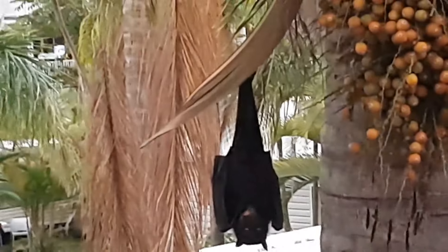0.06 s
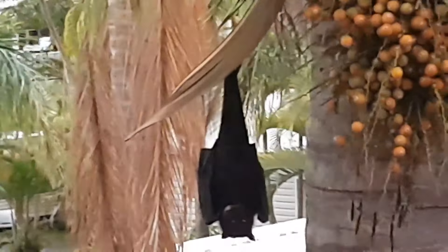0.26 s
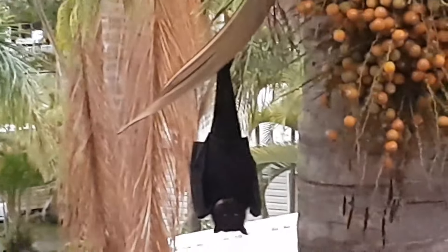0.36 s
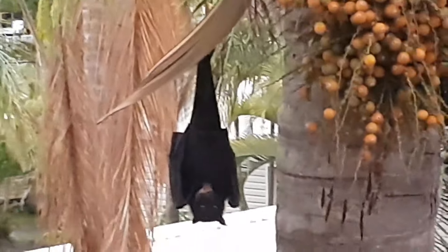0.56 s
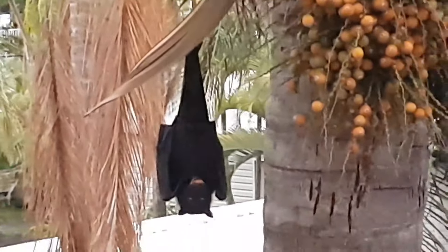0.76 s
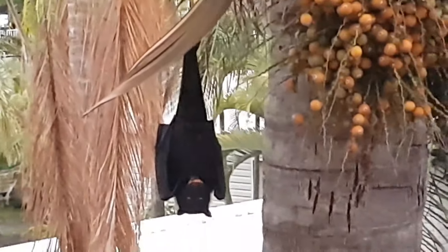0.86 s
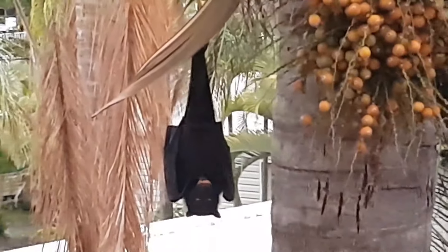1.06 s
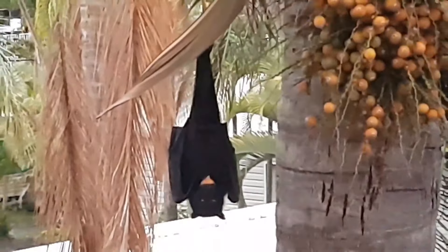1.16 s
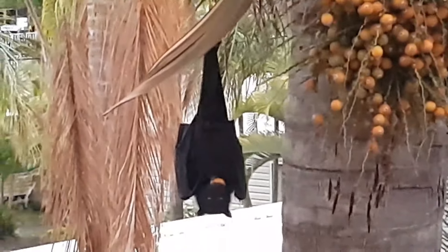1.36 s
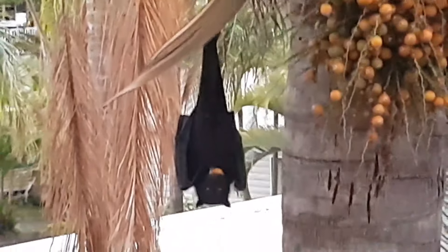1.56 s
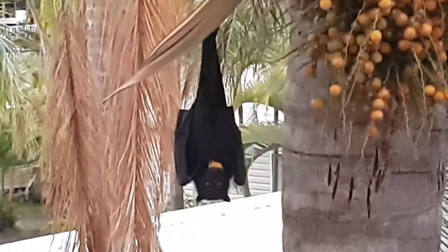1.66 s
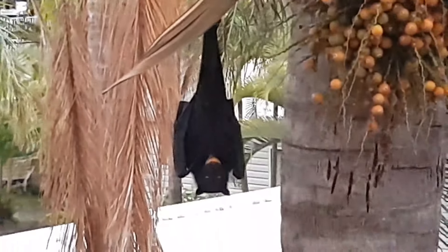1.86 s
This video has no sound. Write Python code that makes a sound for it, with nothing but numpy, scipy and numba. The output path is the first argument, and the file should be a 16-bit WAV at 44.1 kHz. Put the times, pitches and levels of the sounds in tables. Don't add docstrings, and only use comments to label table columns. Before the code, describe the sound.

A hanging fruit bat screeches roughly, one long then one short, over thin insect whine and chirps

```python
import sys
import numpy as np
from scipy import signal
from scipy.io import wavfile
from scipy.ndimage import uniform_filter1d
from numba import njit

SR = 44100
rng = np.random.default_rng(int(sys.argv[2]) if len(sys.argv) > 2 else 0)


def linear_from_db(decibels):
    return 10 ** (np.asarray(decibels, float) / 20)


def master_out(mix):
    frames = np.transpose(np.atleast_2d(mix))
    ceiling = np.clip(frames, -1, 1)
    pcm = np.round(ceiling * 32767).astype(np.int16)
    wavfile.write(sys.argv[1], SR, pcm)


N = 85995

# start_s, level_db, chest_db, chest_tuning_ratio, whistle_db, throat_db, cheek_db
SQUAWKS = [
    [(.18, -55, -15, 0.91, 2, -3, 3), (.2, -45, -16, 0.82, 7.5, -6, -4), (.23, -54, -26, 0.73, 3, 1.5, 1)],
    [(.528, -56.5, 8, .67, -10, 1, 1), (.552, -28, -4, 0.86, -1.5, 3, 4.5),
     (.59, -26, -4, 0.92, -0.5, -2.5, 2), (.64, -26, -9, 0.95, 0.5, 3, -11.5),
     (.71, -30, -1, 0.95, -2.5, 1.5, -3.5), (.79, -27.5, -8.5, 1, -0.5, 2.5, -8.5),
     (.87, -29, 0, 0.95, -2, 6, -3), (.95, -51.5, 2.5, 1.0, -6, 10, 5), (1.06, -58, -5, 1.0, -2, 7, 6)],
    [(1.295, -53, 5, 1, -11, -3, -5), (1.318, -34, -0.5, 0.886, 3.5, -1, -8),
     (1.333, -24, -1.5, .93, 2.5, -2, -2.5), (1.37, -26, -5, .89, -2.5, -6, 0.5),
     (1.46, -48, 2, .91, -0.5, -10, -4), (1.55, -42.5, 2.5, .9, -1.5, -3, 5)],
    [(1.562, -41.5, -3, .99, 0, -4, -4), (1.585, -34, -1.5, 1, -0.5, 1, 3),
     (1.62, -39.5, 2, 0.99, 5, 4, -5), (1.66, -41, 5.5, 0.96, -2.5, -4, 0),
     (1.76, -65, 3, 0.91, -10, 0, 11)],
]
# centre_hz, width_hz, level_db
MOUTH = [(6110, 540, -3), (6682, 870, 1.5)]
THROAT = [(3710, 450, -6), (4070, 420, 1)]
CHEEK = [(5347, 880, 0)]
WHISTLE = [(7443, 890, -3.5), (8473, 1260, 0)]
CHEST = [(2400, 530, -5.5), (3060, 510, 3.5)]
GROWL = [(1840, 1650, 0)]


def near_bat():
    source = vocal_folds(hz=617.9, jitter=.35, scatter_db=-0.5, noise=0.75)
    growling = np.arange(N) / SR < 1.4
    mouth = ring(source, MOUTH, 0.97)
    throat = linear_from_db(curve(SQUAWKS, column=5) - 9) * ring(source, THROAT, 0.99)
    cheek = linear_from_db(curve(SQUAWKS, column=6) - 1.5) * ring(source, CHEEK, 0.95)
    growl = linear_from_db(-13.5) * growling * ring(source, GROWL, 1)
    whistle = linear_from_db(curve(SQUAWKS, column=4)) * ring(source, WHISTLE, 0.95)
    chest = linear_from_db(curve(SQUAWKS, column=2) - 1.5) * ring(source, CHEST, curve(SQUAWKS, column=3))
    voice = mouth + throat - cheek - growl - whistle + chest
    effort_db = curve(SQUAWKS, column=1) - 4.5 + 0.5 * walk(60.15)
    return voice * linear_from_db(effort_db) * sounding(SQUAWKS)


# start_s, level_db, pitch_hz, throat_hz, throat_db, bright_db, overtone_db
FAR_FIRST = [
    (.135, -55, 527, 1520, 0, -3, 0),
    (.152, -47, 528, 1530, -10, -10, 0),
    (.185, -55, 497, 1480, 12, -4, 0),
    (.225, -51, 493, 1470, 10, -4, -3),
    (.268, -47, 530, 1600, -3, 2, -3),
    (.31, -50, 559, 1700, 13, 6, -1),
    (.375, -63, 570, 1620, 4, 0, 0),
    (.44, -59, 575, 1730, 11, -2, -5),
    (.49, -70, 565, 1720, 3, 0, 0),
]
FAR_SECOND = [
    (1.217, -69, 625, 1850, 10.5, -15, -15),
    (1.235, -55, 620.6, 1810, 10.5, -14, -11),
    (1.255, -41.5, 602.6, 1880, -0.5, -25, -21),
    (1.289, -49, 593.8, 2120, 4.5, -10, -5),
    (1.336, -57.5, 566.2, 2220, 6.5, -12, 10.5),
    (1.429, -49, 564.3, 2540, 4, -9, 2),
    (1.535, -50.5, 589, 2520, 3.5, -16, -12),
    (1.619, -51, 641.5, 2400, 9, -11, -12),
    (1.761, -58, 646, 2400, -14, -11, -13),
]
# multiple, width_hz, level_db
FAR_LOW = [(2, 220, -2), (4, 220, -1), (5, 220, -5), (6, 150, -22)]
# centre_hz, width_hz, level_db
FAR_UPPER = [(4150, 290, -7.5), (6120, 810, -5)]


def far_bat():
    calls = [FAR_FIRST, FAR_SECOND]
    second = np.arange(N) / SR > FAR_FIRST[-1][0]
    hoarseness = 1.8 ** second
    pitch_hz = curve(calls, column=2)
    source = vocal_folds(pitch_hz, .028 * hoarseness, 2.3, .4 * np.sqrt(hoarseness))
    throat = unit(band(source, curve(calls, column=3), 330))
    voice = linear_from_db(curve(calls, column=4)) * throat
    for multiple, width_hz, db in FAR_LOW:
        level_db = db + 2.0 * walk(19.82) + curve(calls, column=6) * (multiple > 3)
        voice = voice + linear_from_db(level_db) * unit(band(source, np.round(multiple) * pitch_hz, width_hz))
    for hz, width_hz, db in FAR_UPPER:
        edge = unit(band(source, hz * np.sqrt(pitch_hz / 560), width_hz))
        voice = voice + linear_from_db(db + curve(calls, column=5)) * edge
    breath = linear_from_db(0.5 - 5 * second) * unit(band(source, 6500, 3500))
    level_db = curve(calls, column=1) + 0.39 * walk(40)
    return (voice + breath) * linear_from_db(level_db) * sounding(calls)


def vocal_folds(hz, jitter, scatter_db, noise):
    chance = rng.standard_normal((N, 3)).T
    phase = np.cumsum(hz * (1 + jitter * walk(700)).clip(.2)) / SR
    cycle = phase.astype(int)
    size = linear_from_db(scatter_db * chance[0][cycle])
    pulses = np.diff(cycle, prepend=0) * size
    puffs = chance[1] * size * np.exp(-(phase % 1) / .5)
    share = np.clip(noise, 0, 1)
    return np.sqrt(1 - share) * unit(pulses) + np.sqrt(share) * unit(puffs)


def ring(source, table, tuning):
    out = 0
    for k, (hz, width_hz, db) in enumerate(table):
        level = linear_from_db(db + 2.1 * walk(34.95))
        centre_hz = hz * tuning * (1 + 0.016 * walk(15.12))
        out = out + (-1) ** k * level * unit(band(source, centre_hz, width_hz))
    return unit(out)


# start_s, level_db
DIPS = [(.064, -52), (.097, -48), (.272, -52), (0.302, -47), (.488, -48), (0.518, -48.5), (1.085, -50.5),
        (1.116, -46.5), (1.262, -51.5), (1.288, -48.5), (1.489, -49.5), (1.521, -46.5), (1.678, -51),
        (1.713, -45), (1.891, -48), (1.922, -46)]
# start_s, level_db, pitch_hz
SLIDES = [
    (0.183, -47.5, 5780),
    (.221, -45.5, 5840),
    (.416, -48.5, 5780),
    (.455, -47, 5850),
    (1.096, -46.5, 5750),
    (1.132, -46, 5859),
    (1.193, -55, 6457),
    (1.766, -49, 5770),
    (1.805, -46.5, 5820),
]


def birds():
    out = np.zeros(N + SR)
    for start_s, db in DIPS:
        add_chirp(out, start_s, db, 5420, .019, lambda u: .125 * (1 - abs(u - .6) / .6))
    for start_s, db, hz in SLIDES:
        add_chirp(out, start_s, db, hz, .01, lambda u: .11 * u)
    out = out[:N] * linear_from_db(3.5 * walk(500))
    return out + linear_from_db(-2) * echo(out, t60_s=.035, first_s=.002)


def add_chirp(out, start_s, db, hz, length_s, drop):
    u = np.arange(int(length_s * SR)) / (length_s * SR)
    phase = 2 * np.pi * np.cumsum(hz * (1 - drop(u))) / SR
    start = int(start_s * SR)
    out[start:start + len(u)] += linear_from_db(db + 4) * np.sin(phase) * np.sqrt(np.sin(np.pi * u))


def insect():
    return unit(band(rng.standard_normal(N), 7880, 170)) * linear_from_db(-60 + 2.2 * walk(6))


# multiple, level_db
MOTOR = [(1, -54), (2, -50), (3, -56.5), (4, -59)]


def motor():
    t = np.arange(N) / SR
    phase = 2 * np.pi * np.cumsum(95.46 * (1 + 0.0071 * walk(5.07))) / SR
    near_db = -15.5 / (1 + np.exp((t - 0.85) / 0.069))
    hum = 0
    for multiple, db in MOTOR:
        hum = hum + np.sqrt(2) * linear_from_db(db + 1.27 * walk(9.5)) * np.sin(np.round(multiple) * phase)
    return linear_from_db(near_db) * hum


# centre_hz, level_db (per Hz)
YARD = [(13, -47), (22, -11.5), (208, -3.5), (433, -9), (558, -18), (1460, -20.5), (5410, -24.5),
        (8110, -27), (9200, -37), (12000, -70.5), (20200, -120)]


def yard():
    out, table = 0, np.array(YARD)
    traffic_rise_db = np.linspace(-.5, .5, N) * 3
    for hz in 25 * 2 ** np.arange(0, 8.7, 1 / 3):
        db = np.interp(np.log(hz), np.log(table[:, 0]), table[:, 1]) + 10 * np.log10(hz)
        db = db + 0.89 * walk(5.6) + traffic_rise_db * (hz < 700)
        out = out + linear_from_db(db) * unit(svf(rng.standard_normal(N), np.full(N, hz), hz / 4))
    return unit(out) * linear_from_db(-44)


def echo(x, t60_s=0.45, first_s=.008):
    t = np.arange(SR // 2) / SR
    tail = rng.standard_normal(len(t)) * linear_from_db(-60 * t / t60_s) * (t > first_s)
    return signal.fftconvolve(x, tail / np.sqrt(np.sum(tail ** 2)))[:N]


@njit
def svf(x, hz, width):
    y, b, l = np.empty(len(x)), 0., 0.
    for i in range(len(x)):
        g, k = np.tan(np.pi * hz[i] / SR), width / hz[i]
        v = (b + g * (x[i] - l)) / (1 + g * (g + k))
        b, l, y[i] = 2 * v - b, l + 2 * g * v, k * v
    return y


def band(x, hz, width):
    hz = np.clip(hz + np.zeros(N), 15, .45 * SR)
    return svf(svf(x, hz, 1.27 * width), hz, 1.27 * width)


def unit(x):
    return x / np.sqrt(np.mean(x ** 2))


def walk(rate):
    k = int(SR / rate)
    steps = np.repeat(rng.standard_normal(N // k + 1), k)
    return unit(uniform_filter1d(uniform_filter1d(steps, k), k)[:N])


def curve(calls, column):
    rows = np.concatenate([np.array(c, float) for c in calls])
    return np.interp(np.arange(N) / SR, rows[:, 0], rows[:, column])


def sounding(calls):
    t = np.arange(N) / SR
    gate = 1. - (t < calls[0][0][0]) - (t > calls[-1][-1][0])
    for call, following in zip(calls, calls[1:]):
        end_s, next_s = call[-1][0], following[0][0]
        if next_s - end_s > .05:
            gate = gate - ((t > end_s) & (t < next_s))
    return uniform_filter1d(gate, size=400)


def scene():
    near, far, chirps = near_bat(), far_bat(), birds()
    returns = echo(linear_from_db(-2.5) * near + linear_from_db(-9) * far + linear_from_db(-10) * chirps)
    mono = near + far + chirps + returns + insect() + motor() + yard()
    return np.array([mono, mono])


def low_pass(x):
    return signal.sosfilt(signal.butter(12, 14500, fs=SR, output="sos"), x)


# start_s, end_s, centre_hz, width_hz, drift_hz_per_s
DROPS = [(.62, .76, 4520, 200, 1600), (.76, 1.12, 4720, 180, -1100), (.72, 1.05, 2380, 130, 200),
         (.16, .34, 2320, 120, 500), (.35, .41, 2920, 130, 0), (1.36, 1.45, 2030, 130, 0),
         (1.42, 1.66, 3290, 130, 400), (1.35, 1.45, 4700, 200, 0), (1.52, 1.85, 3950, 170, -600),
         (1.53, 1.76, 4450, 180, -1100), (1.62, 1.73, 2090, 120, 0), (1.24, 1.31, 3330, 200, 0),
         (1.22, 1.29, 2570, 200, 0), (.46, .51, 6550, 200, 0), (.42, .46, 8450, 400, 0)]
# time_s, edge_hz
TOP = [(0, 8820), (.44, 8730), (.55, 8950), (.63, 8800), (.95, 8870), (1.15, 8170), (1.2, 8800),
       (1.6, 8780), (1.77, 8570), (1.79, 8310), (1.82, 8000), (1.84, 8700), (1.92, 8550), (1.95, 8400)]
# time_s, length_s
JOLTS = [
    (.556, .017),
    (1.325, .008),
]


def jolt(t):
    return sum(np.exp(-((t - s) / length_s) ** 4) for s, length_s in JOLTS)


def record(dry):
    hz, t, z = signal.stft(dry[0], SR, nperseg=1024)
    above_hz = hz[:, None] - np.interp(t, *np.array(TOP).T)
    gain_db = -np.clip(above_hz / 4, 0, 90)
    for start, end, centre, width, drift in DROPS:
        off = (hz[:, None] - centre - drift * (t - start)) / width
        fade = np.clip(np.minimum(t - start, end - t) / .02 + .5, 0, 1)
        gain_db = gain_db - 30 * np.exp(-(2.1 * off) ** 4) * fade
    grain = uniform_filter1d(rng.standard_normal(z.shape), size=7, axis=1)
    gain_db = gain_db + 3.5 * (grain / grain.std() - .4) * (hz[:, None] > 400)
    leak = jolt(t) * (above_hz > 0) * linear_from_db(-19 - 2 * above_hz / 1000)
    mid = signal.istft(z * (linear_from_db(gain_db) + leak), SR, nperseg=1024)[1][:N]
    side = linear_from_db(-19) * jolt(np.arange(N) / SR) * np.roll(mid, 300)
    return low_pass(np.array([mid + side, mid - side]))


dry = scene()
out = record(dry)
master_out(out)
```